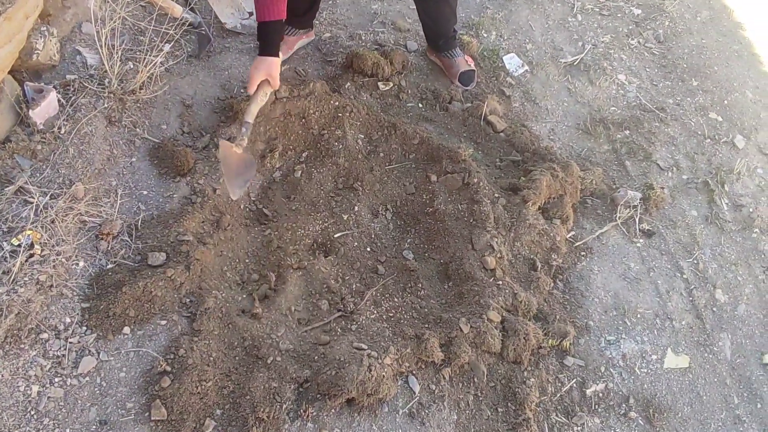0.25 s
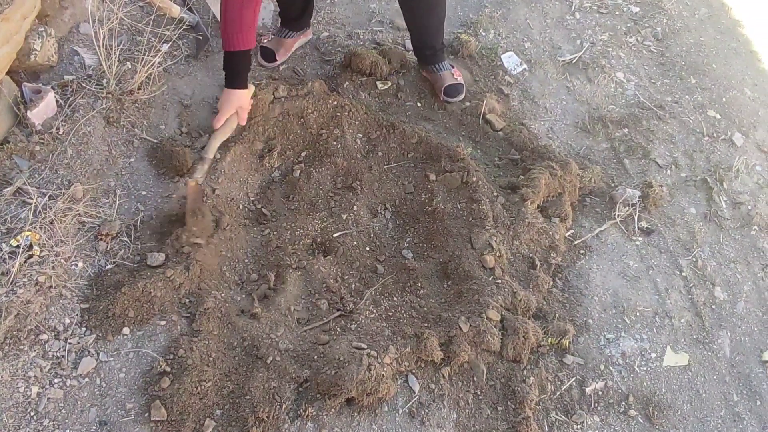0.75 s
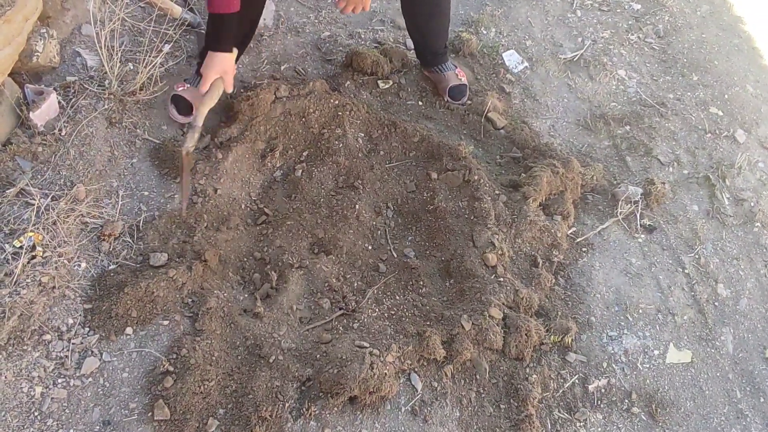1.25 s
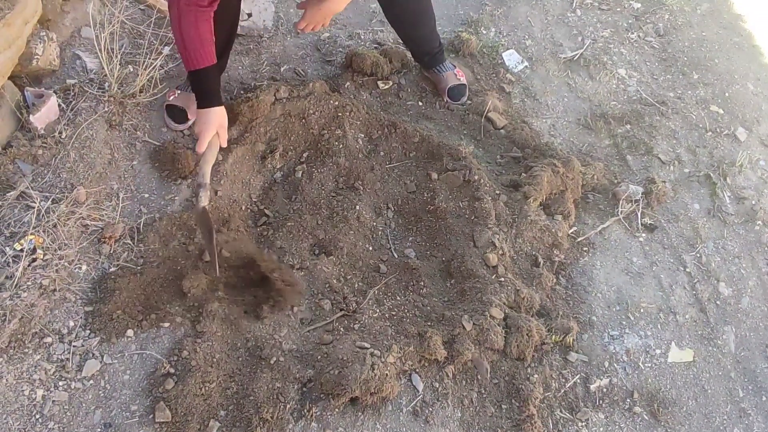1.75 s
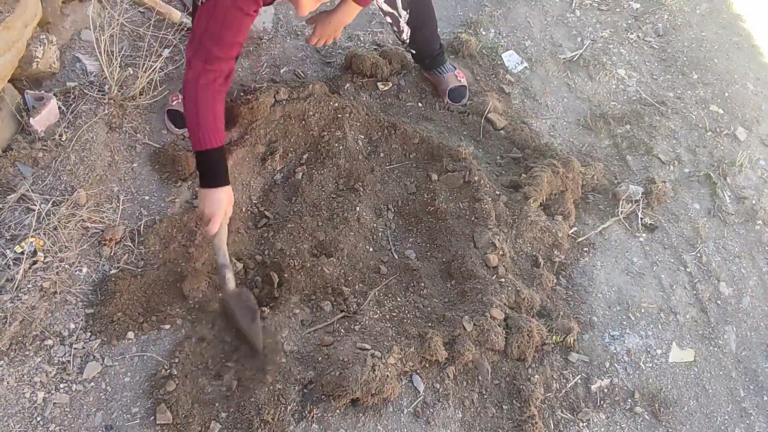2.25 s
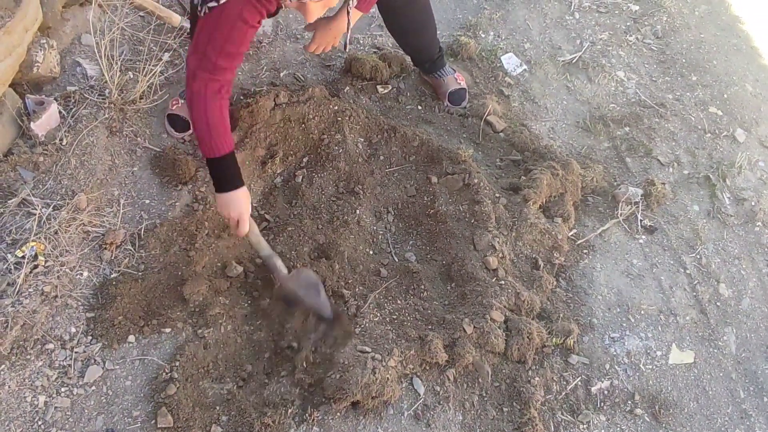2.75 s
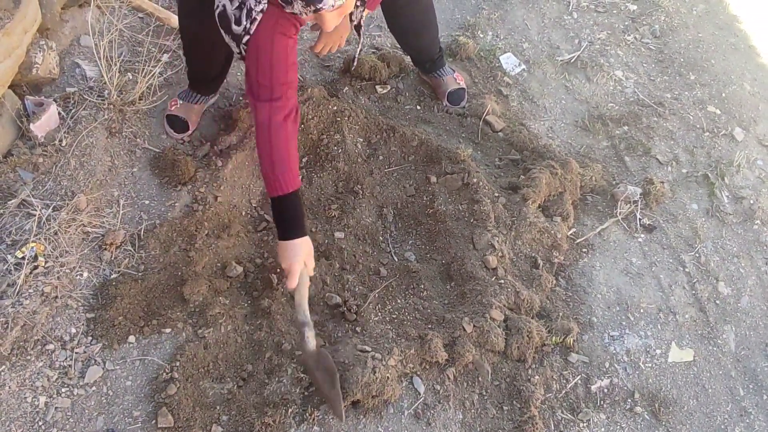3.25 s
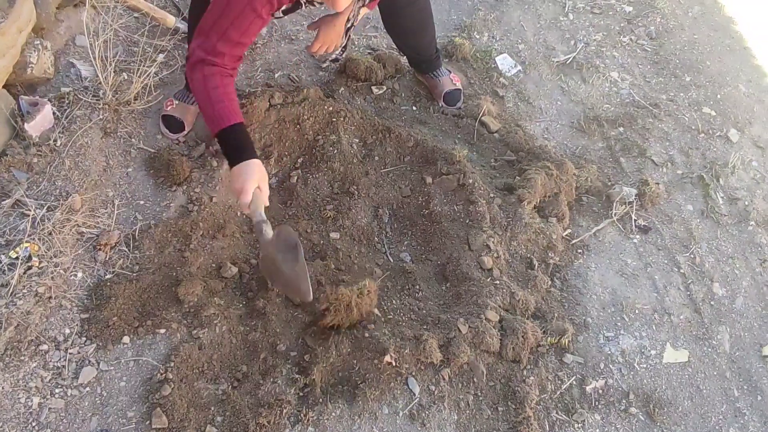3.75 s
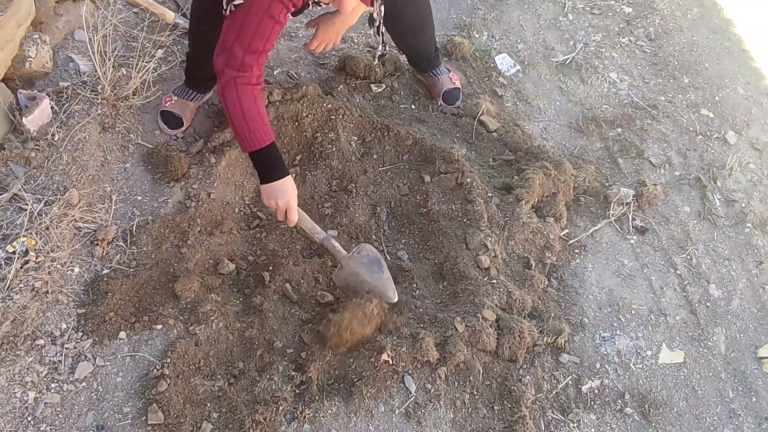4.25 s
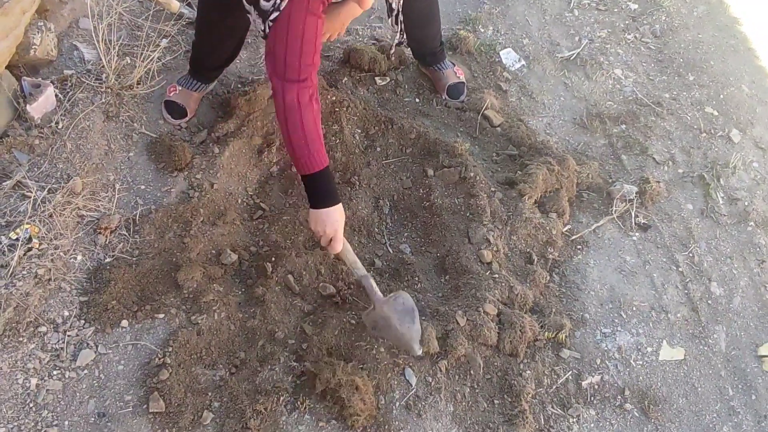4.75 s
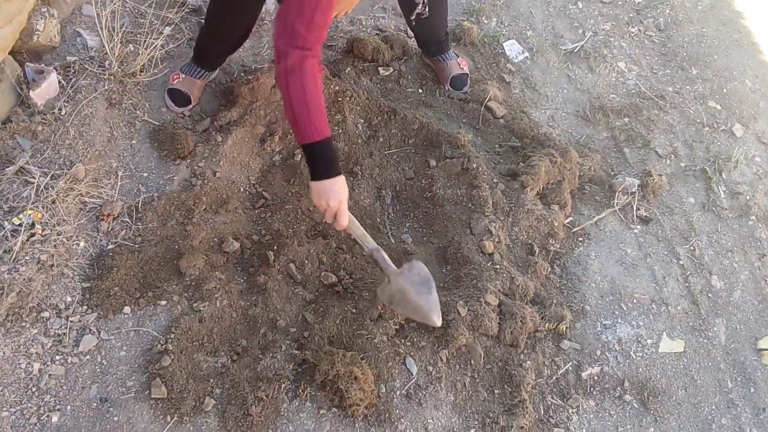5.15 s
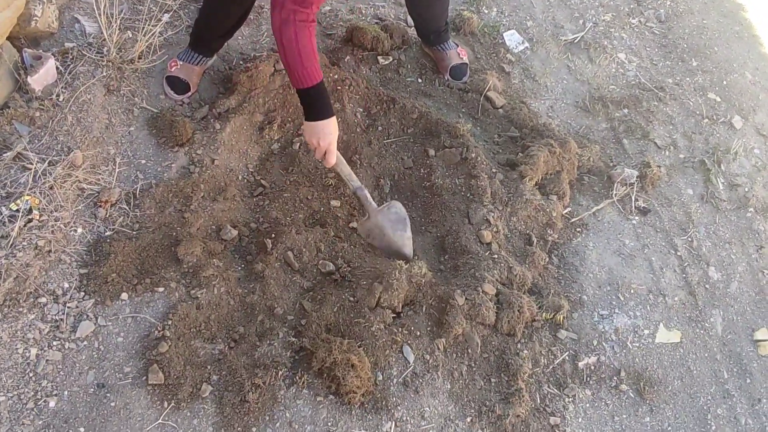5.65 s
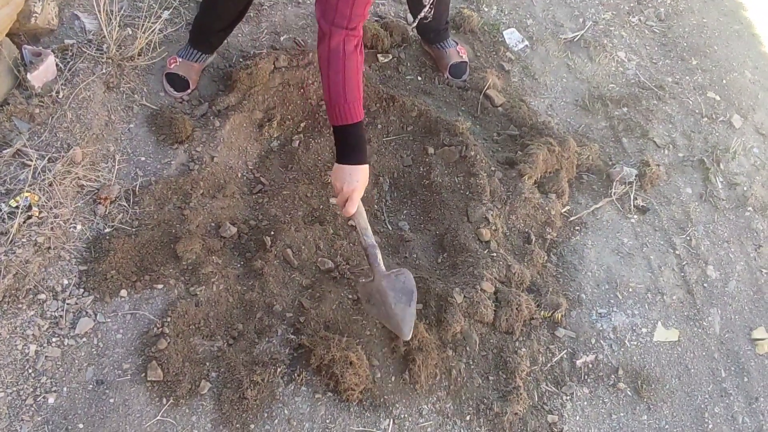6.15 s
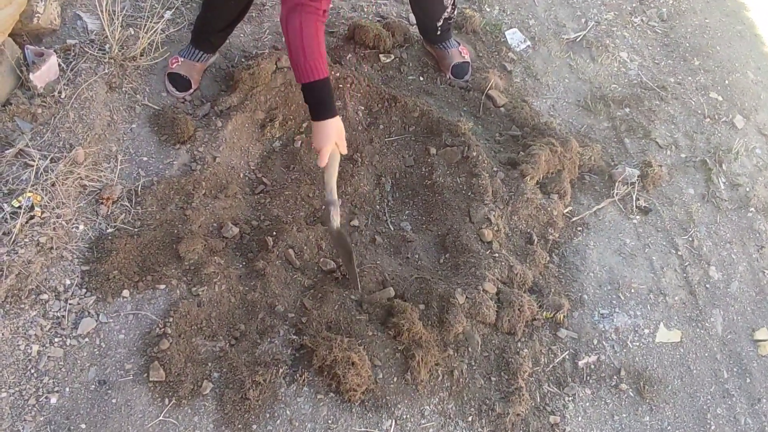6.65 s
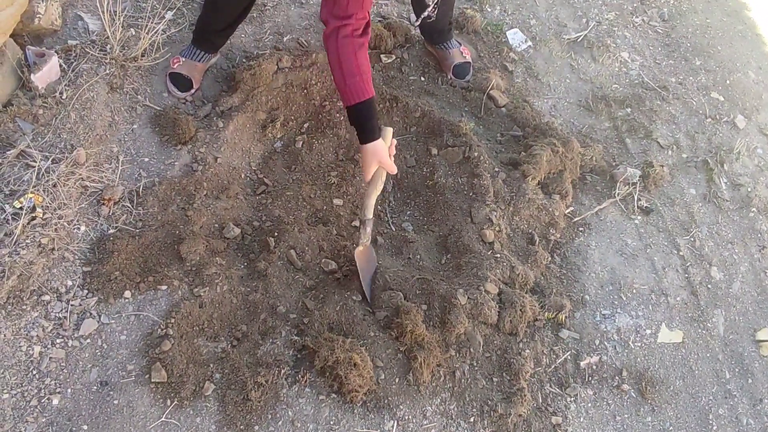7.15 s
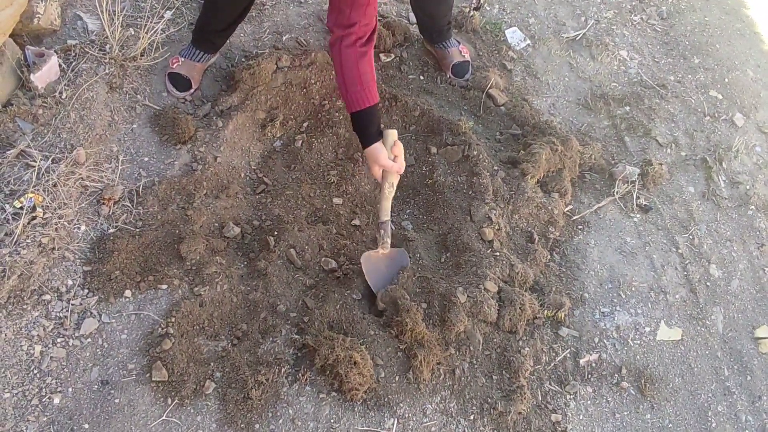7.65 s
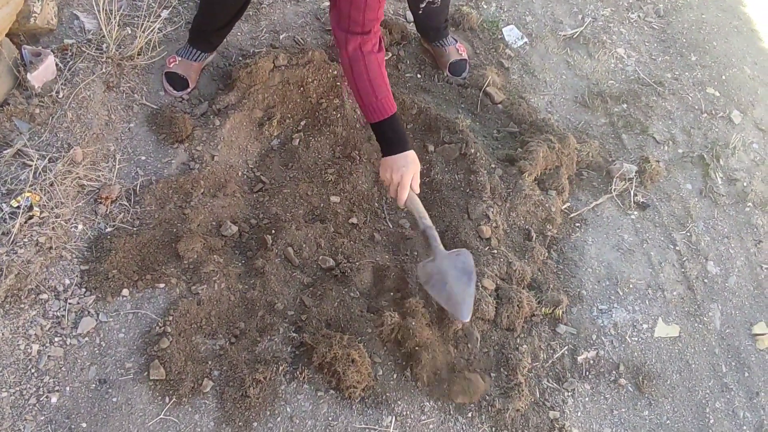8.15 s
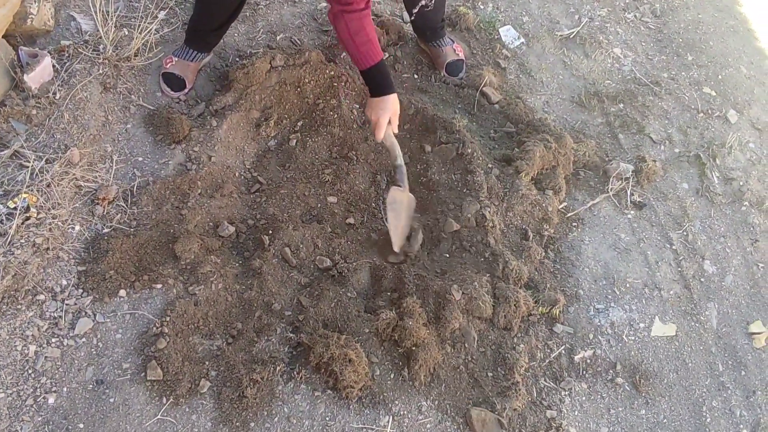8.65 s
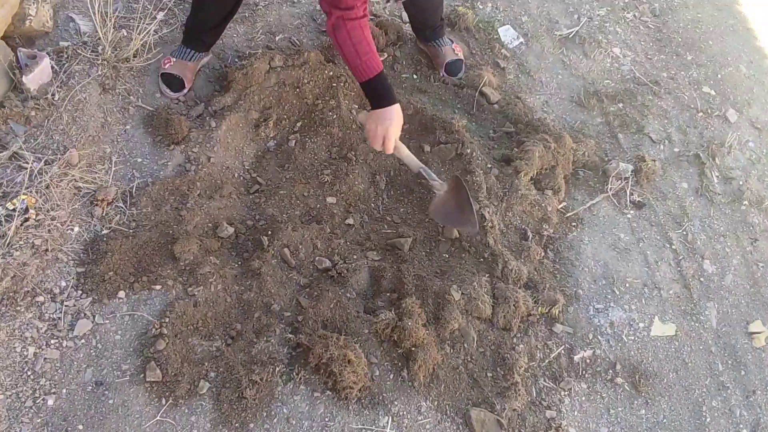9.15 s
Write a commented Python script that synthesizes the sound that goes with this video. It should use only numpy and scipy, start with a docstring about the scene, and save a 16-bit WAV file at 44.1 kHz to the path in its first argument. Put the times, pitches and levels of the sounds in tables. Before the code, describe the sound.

Gritty digging outdoors: steel blade strikes and drags through stony ground, loose dirt patters down, and low gusts rumble increasingly.

```python
"""Spade in stony soil

A spade chops and drags through dry stony soil: noise bursts ring the modes of the steel blade,
grit clicks along it, packed ground knocks, and thrown soil patters down as filtered ticks.
Gusts of shaped noise rumble at each microphone port on its own; a low sine sounds once, over faint hiss."""
import sys
import numpy as np
from scipy import signal
from scipy.fft import rfft, irfft
from scipy.io import wavfile
from scipy.ndimage import uniform_filter1d, map_coordinates

SR = 44100
rng = np.random.default_rng(int(sys.argv[2]) if len(sys.argv) > 2 else 0)


def store_pcm(level_fs):
    """Save levels as 16-bit WAV."""
    pcm = np.round(np.clip(level_fs, -1, 1) * 32767).astype(np.int16)
    wavfile.write(sys.argv[1], SR, np.atleast_2d(pcm).T)


N = 414540

# Modes of the steel blade. Each row: frequency in Hz, level in dB, t60 in s before damping.
BLADE_MODES = [(1580, -31, .04), (2140, -26, 0.05), (2370, -21, 0.13), (2617, -19, 0.0714),
               (3586, -14.5, 0.065), (4380, -18.5, 0.043), (4830, -26, 0.023), (5745, -17, 0.11),
               (6120, -12, 0.05), (6650, -24, 0.059), (7762, -5, .07), (10052, -8, .07), (7770, -4.5, 0.1),
               (8250, -8.5, 0.062), (9000, -6, 0.045), (9520, -20.5, 0.048), (10400, 0, .04),
               (11240, -22, 0.09), (13500, -15, 0.06), (13600, -22.5, .04)]
# Spectrum of stone on steel. Each row: frequency in Hz, relative level in dB per Hz.
GRIT_SPECTRUM = [(500, -62), (1000, -23), (1500, -23.5), (2400, -6.5), (3600, 8.5), (5200, -3), (7000, 6.5),
                 (9100, 10), (11000, 9), (13500, -1), (15000, 10.5)]
# How freely the blade rings; soft soil muffles it. Each row: time in s, ring gain in dB.
RING_FREEDOM = [(1.0, 2.5), (1.9, -0.5), (2.4, -0.5), (3.5, -1), (4.5, -3), (5.5, -3), (6.5, 2), (7.5, 1.5),
                (8.2, -4), (8.8, -2.5)]


def gain_of(db):
    """Decibels to an amplitude factor."""
    return 10 ** (np.asarray(db) / 20)


def evened(x):
    """Scaled to rms 1."""
    return x / np.sqrt(np.mean(x ** 2) + 1e-20)


def read(points, hz, axis=1):
    """A column of a spectrum table, interpolated over log frequency."""
    table = np.transpose(points)
    return np.interp(np.log(hz + 1), np.log(table[0] + 1), table[axis])


def coloured(x, points):
    """x filtered by a spectrum table, without phase shift."""
    hz = np.fft.rfftfreq(len(x), 1 / SR)
    return irfft(rfft(x) * gain_of(read(points, hz)), len(x))


def slow_noise(samples):
    """Noise smoothed twice over the given span, rms 1."""
    smooth = uniform_filter1d(rng.standard_normal(N), size=samples)
    return evened(uniform_filter1d(smooth, size=samples))


def follow(rows, rise_db_per_s, fall_db_per_s):
    """Gain of strokes: each rises, slides from its first level to its last, and falls away."""
    t, out = np.arange(N) / SR, np.zeros(N)
    for start_s, length_s, first_db, last_db in rows:
        near = slice(max(round((start_s - .2) * SR), 0), round((start_s + length_s + .3) * SR))
        u = t[near] - start_s
        db = np.interp(u, [0, length_s], [first_db, last_db])
        db += rise_db_per_s * np.minimum(u, 0)
        db -= fall_db_per_s * np.maximum(u - length_s, 0)
        out[near] = np.maximum(out[near], gain_of(db))
    return out


def add(mix, start_s, sound):
    """Mixes a two-port sound in at a time."""
    part = mix[:, max(round(start_s * SR), 0):][:, :sound.shape[1]]
    part += sound[:, :part.shape[1]]


def grains(per_s, spread_db, hiss):
    """Sparse clicks of uneven size over a fine hiss."""
    sizes = gain_of(spread_db * np.minimum(rng.exponential(1, N), 4))
    sizes *= rng.choice([-1., 1.], N)
    clicks = evened(sizes * (rng.random(N) < per_s / SR))
    return evened(clicks + hiss * rng.standard_normal(N))


def crunch_of(noise, decay_s):
    """Noise burst with a quick rise and an exponential decay."""
    t = np.arange(len(noise)) / SR
    rise = 1 - np.exp(-t / .0008)
    return noise * rise * np.exp(-t / np.clip(decay_s, .0005, .015))


def air():
    """Steady murmur and hiss: two noises, partly alike at the ports by frequency."""
    # Still air and microphone hiss. Each row: frequency in Hz, relative level in dB per Hz,
    # left-right likeness from 0 to 1.
    air_spectrum = [(19.7, -17.5, .3), (61.3, -2.5, 0.2), (131.2, -23.5, 0.57), (250, -19, 0.76),
                    (543, -25, 0.3), (960, -28, 0), (2230, -35, 0.14), (5960, -39, 0), (10140, -34.5, 0.02),
                    (13600, -39.5, 0)]
    level_db = -56.5
    hz = np.fft.rfftfreq(N, 1 / SR)
    a, b = rfft(rng.standard_normal((2, N)))
    same = np.clip(read(air_spectrum, hz, axis=2), -1, 1)
    ports = np.array([a, same * a + np.sqrt(1 - same ** 2) * b])
    return gain_of(level_db) * evened(irfft(ports * gain_of(read(air_spectrum, hz)), N))


def hum():
    """A brief steady low sine, alike at both ports."""
    start_s, length_s, hz, rms_db, fade_db_per_s = 5.47, 0.32, 100., -51.5, 191.5
    gain = follow([(start_s, length_s, rms_db, rms_db)], fade_db_per_s, fade_db_per_s)
    return np.sqrt(2) * gain * np.sin(2 * np.pi * hz * np.arange(N) / SR)


def eddy(hz):
    """One whirl of air at a port: a push, then suction."""
    u = hz * np.pi * np.arange(-600, 600) / SR
    return (1 - 2 * u ** 2 - 1.5 * u) * np.exp(-u ** 2)


def wind():
    """Lumpy turbulence, unrelated at the two ports, brighter as it strengthens, plus strong eddies."""
    # Gusts. Each row: peak time in s, peak level in dB, time to fall 10 dB in s (held to 0.03..1),
    # port (0 left, 1 right).
    gusts = [(.11, -34, 0.12, 0), (0.129, -37.5, 0.2, 1), (0.586, -20, 0.0273, 0), (0.701, -27.5, 0.24, 0),
             (0.817, -25.5, 0.13, 0), (1.25, -31, 0.16, 0), (1.3, -41, -1, 1), (1.801, -34.5, -0.02, 0),
             (1.989, -29, 0.25, 0), (2.07, -36.5, 0.47, 1), (2.15, -51, 1, 0), (2.38, -29.5, 0, 0),
             (2.45, -43.5, 1, 1), (2.65, -33, -0.38, 0), (2.76, -31.5, -0.6, 1), (2.819, -38, -0.4, 0),
             (3.02, -40, 0.44, 0), (3.311, -39, 0.56, 0), (3.53, -32.5, -0.1, 0), (3.63, -47, 2, 1),
             (3.73, -37, -0.26, 0), (4.11, -27, -0.05, 1), (4.17, -28, -0.15, 1), (4.16, -29.5, -0.18, 0),
             (4.351, -32, 0.16, 1), (4.42, -36, 0.48, 0), (5.2, -42.5, 0.05, 0), (5.78, -39, 0.36, 1),
             (6.021, -26.5, 0.11, 0), (6.072, -19, 0.0637, 1), (6.241, -20.5, 0.0337, 0),
             (6.248, -26.5, 0.32, 1), (6.449, -33, -0.4, 1), (6.482, -20, 0.16, 0),
             (6.671, -16.5, 0.1149, 1), (6.78, -26, 0, 0), (6.98, -25, 0.6, 0), (7.391, -21.5, 0.16, 0),
             (7.451, -34.5, 1, 1), (7.699, -29.5, 0.34, 1), (7.8, -27, 0.08, 0), (7.949, -28.5, -0.25, 1),
             (8.03, -22.5, -0.27, 0), (8.3, -21, 0.31, 1), (8.3, -27, 0.4, 0), (8.499, -22, -0.03, 0),
             (8.749, -35, -1, 0), (8.8, -15, 0.12, 1), (8.98, -22.5, -0.08, 0), (9.05, -24, 0.36, 1),
             (9.191, -26.5, 0.3, 0), (9.25, -33, 1.4, 1), (9.381, -32.5, 0.55, 0), (9.4, -33, -1.8, 1)]
    # Strongest eddies. Each row: centre time in s, level in dB, nominal frequency in Hz,
    # port (0 left, 1 right).
    eddies = [(0.081, -28.5, 213, 0), (0.565, -19, 250, 0), (0.638, -17, 268, 0), (.694, -27.5, 337, 0),
              (.736, -20.5, 457, 0), (.781, -18.5, 425, 0), (0.799, -19, 376, 0), (.824, -14, 440, 0),
              (.839, -11.5, 297, 0), (.865, -14, 442, 0), (1.961, -30.5, 233, 0), (3.026, -31, 215, 0),
              (4.099, -27.5, 197, 1), (6.066, -15.5, 191, 1), (6.256, -18.5, 198, 0),
              (6.449, -21.5, 390, 0), (6.646, -13, 210, 1), (6.754, -15, 249, 1), (7.221, -21, 251, 0),
              (7.394, -24.5, 373, 0), (7.409, -19.5, 310, 0), (7.453, -18, 297, 0), (7.467, -22.5, 366, 0),
              (7.976, -26.5, 330, 0), (8.025, -19.5, 420, 0), (8.47, -29, 250, 0), (8.502, -22, 232, 0),
              (8.71, -29, 258, 1), (8.743, -12.5, 225, 1), (8.823, -19, 202, 1), (8.925, -10, 175, 1),
              (8.982, -22, 280.5, 0), (9.186, -24, 236, 0)]
    # Weak wind. Each row: frequency in Hz, relative level in dB per Hz.
    weak_spectrum = [(8.8, -23), (15, 31.5), (81, 0.5), (216, -24.5), (269, -38.5), (400, -47),
                     (520, -73.5), (880, -120)]
    # Strong wind. Each row: frequency in Hz, relative level in dB per Hz.
    strong_spectrum = [(8.8, -36), (15, 2), (64, 7.5), (139, 2), (291, -14), (708, -48), (771, -52.5),
                       (900, -58), (1170, -86), (1980, -120)]
    calm_db, gale_above_calm_db = -51, 28
    rise_share = 0.91  # gusts rise faster than they fall

    frames, hz = N // 256 + 5, np.fft.rfftfreq(1024, 1 / SR)[:40]
    t = np.arange(frames) * 256 / SR
    out = np.zeros((2, N))
    peak_s, peak_db, fall_s, ports = np.transpose(gusts)[:, :, None]
    width_s = np.clip(fall_s * np.where(t < peak_s, rise_share, 1), .03, 1)
    swell_power = gain_of(peak_db - 10. * ((t - peak_s) / width_s) ** 2) ** 2
    for port in (0, 1):
        gust_power = swell_power[ports[:, 0].round() == port].sum(0)
        level_db = 10 * np.log10(gain_of(calm_db) ** 2 + gust_power)
        flicker = evened(uniform_filter1d(rng.standard_normal(frames), size=6))
        strength = (level_db - calm_db) / gale_above_calm_db * (1 + 0.12 * flicker)
        strength = np.clip(strength, 0, 1.25) ** 1.36
        shape_db = np.outer(read(weak_spectrum, hz), 1 - strength)
        shape_db += np.outer(read(strong_spectrum, hz), strength)
        shape = gain_of(shape_db)
        a, b = rng.standard_normal((frames, 40, 2)).T
        bins = (a + 1j * b) * shape / np.linalg.norm(shape, axis=0)
        bins = np.pad(bins, ((0, 473), (0, 0)))
        turbulence = signal.istft(bins, nperseg=1024, noverlap=768)[1][:N]
        lumps_db = 3.88 * np.clip(slow_noise(500), -3, 1.5)
        rush = evened(turbulence * gain_of(lumps_db))
        out[port] = rush * gain_of(np.interp(np.arange(N) / SR, t, level_db))
    for centre_s, db, eddy_hz, port in eddies:
        whirl = gain_of(db) * eddy(eddy_hz)
        add(out, centre_s - 600 / SR, np.outer([port < .5, port > .5], whirl))
    return out


def soil():
    """Thrown soil rains down as fine ticks spread over the ground; larger pebbles stand out."""
    # Soil pattering down. Each row: start in s, length in s, first level in dB, last level in dB.
    patter_rows = [(0, 0.23, -52, -56.5), (.28, 1, -62.5, -58), (1.07, 0.17, -53, -55.5),
                   (1.34, 0.059, -54.5, -51), (1.9, 0.071, -62.5, -50), (2.55, 0.18, -57, -66.5),
                   (3, 0.17, -52.5, -58.5), (3.75, 0.17, -59.5, -66.5), (4.6, 0.21, -65.5, -58),
                   (5.12, 0.1, -64.5, -62.5), (6, 0.24, -58, -60), (8.31, 0.052, -57, -52),
                   (8.45, 0.063, -60.5, -60.5)]
    # Pebbles and crumbs landing. Each row: time in s, peak level in dB.
    pebbles = [(0.054, -33), (0.104, -36), (0.2207, -43), (0.226, -33), (1.126, -29), (1.15, -40),
               (1.1877, -41), (1.248, -36.5), (1.377, -43), (1.911, -34), (1.9664, -28), (3.035, -25.5),
               (3.079, -35), (3.103, -37), (3.899, -45), (4.62, -45), (4.627, -39), (4.6423, -33.5),
               (4.669, -43), (4.695, -40), (4.752, -37), (4.7907, -37.5), (5.157, -40.5), (5.266, -43.5),
               (5.283, -45), (5.745, -46.5), (6.211, -39), (7.955, -41), (8.339, -39), (8.35, -34),
               (8.525, -37)]
    # Crumbs on the ground. Each row: frequency in Hz, relative level in dB per Hz.
    soil_spectrum = [(880, -40), (1500, -7), (1980, -4), (2620, -8), (5150, -7.5), (8000, 1), (10300, 3.5),
                     (11800, -5), (13800, -2.5), (15000, -14.5)]
    rise_db_per_s, fade_db_per_s = 258, 206

    near, wide = (evened(coloured(grains(per_s=1200, spread_db=3.5, hiss=1.1), soil_spectrum))
                  for _ in range(2))
    out = evened(np.array([near + .8 * wide, near - .8 * wide]))
    clumps_db = 2.23 * slow_noise(500)
    out *= follow(patter_rows, rise_db_per_s, fade_db_per_s) * gain_of(clumps_db)

    t = np.arange(1024) / SR
    envelope = (1 - np.exp(-t / 0.00013)) * np.exp(-t / 0.0022)
    for (start_s, db), noise in zip(pebbles, rng.standard_normal((len(pebbles), 1024))):
        tick = coloured(noise, soil_spectrum) * envelope
        add(out, start_s, gain_of(db) * np.array([tick, tick]) / abs(tick).max())
    return out


def thuds():
    """Packed ground answers the deepest chops with a dull knock: a short low noise burst."""
    # Thuds. Each row: start in s, peak level in dB.
    thud_rows = [(0.9358, -38.5), (1.7738, -27.5), (1.8096, -46.5), (5.956, -35.5), (6.897, -22),
                 (6.948, -37.5), (6.957, -34.5), (6.977, -35.5), (7.533, -43), (8.0762, -38), (8.545, -27),
                 (8.576, -30), (8.6715, -34)]
    # Packed ground. Each row: frequency in Hz, relative level in dB per Hz.
    knock_spectrum = [(250, 7), (600, -2), (1000, 18), (1500, 12), (2500, -28), (5000, -89.5)]
    decay_s = 0.0054
    out = np.zeros((2, N))
    for (start_s, db), noise in zip(thud_rows, rng.standard_normal((len(thud_rows), 4096))):
        knock = coloured(crunch_of(noise, decay_s), knock_spectrum)
        add(out, start_s, gain_of(db) * np.array([knock, knock]) / abs(knock).max())
    return out


def blade(chance, damping, spread_db):
    """Decaying modes at both ports; the contact point sets their levels, detuning and port phases."""
    hz, db, t60_s = np.transpose(BLADE_MODES)[:, :, None]
    level_chance, side_chance, pitch_chance, phase_chance = chance
    t, side = np.arange(4400) / SR, np.array([1, -1])[:, None, None]
    db = db + spread_db * level_chance + side * 2.5 * side_chance
    decay_db = 60 * t * damping / np.clip(t60_s, .01, .1)
    turns = hz * (1 + .007 * pitch_chance) * t
    port_phase = side * 1.43 * np.clip(hz / 7000, .75, 1) * phase_chance
    return (gain_of(db - decay_db) * np.sin(2 * np.pi * turns + port_phase)).sum(1)


def drag():
    """Grit clicks unevenly along the buried blade; the contact keeps moving to another part of it."""
    # Drags. Each row: start in s, length in s, first level in dB, last level in dB,
    # lift below 5 kHz in dB.
    drag_rows = [(0.843, 0.14, -53, -53, 12), (1.704, 0.049, -58.5, -45.5, -8.5),
                 (1.772, 0.058, -84, -41.5, 14), (2.276, 0.053, -47.5, -38, -2.5),
                 (2.389, 0.076, -36, -46.5, 3), (2.761, 0.04, -45.5, -35, -0.5),
                 (2.85, .16, -40.5, -46.5, 5.5), (3.5, 0.029, -46, -58.5, 12.5), (3.538, 0.13, -64, -56, 6),
                 (3.626, 0.11, -48.5, -60.5, 7.5), (4.328, 0.1, -35.5, -52.5, 6),
                 (4.476, 0.054, -63.5, -50.5, 8), (4.907, 0.011, -35, -31.5, -1),
                 (4.956, 0.12, -66.5, -50.5, 11.5), (5.466, 0.025, -21, -37.5, -6),
                 (5.513, 0.052, -49, -54, 6), (5.899, 0.018, -29, -54.5, 3), (5.954, 0.048, -34, -49, 3),
                 (6.388, 0.11, -54, -50, 9.5), (6.57, 0.017, -54, -53, 5.5),
                 (6.901, 0.014, -23.5, -40.5, 7), (6.95, 0.068, -29, -48, 10), (7.055, 0.033, -46, -46, 5),
                 (7.141, 0.025, -44.5, -57.5, 1), (7.22, 0.12, -39, -49.5, 2.5),
                 (7.299, 0.13, -48.5, -34.5, 1), (7.529, 0.14, -53, -69, 14), (7.633, 0.12, -62, -59.5, 11),
                 (7.74, 0.11, -50, -48.5, 12.5), (8.015, 0.063, -61, -51, 12),
                 (8.079, 0.1, -45.5, -62.5, 10.5), (8.194, 0.051, -53, -60, 2.5),
                 (8.549, 0.11, -31, -43.5, 12), (8.661, 0.17, -48, -35, 7)]
    bite_db_per_s, lift_db_per_s = 7000.5, 443
    contact_s = .05

    t, hop = np.arange(N) / SR, round(contact_s * SR)
    judder_db = 3.5 * slow_noise(110)
    grit = grains(per_s=4500, spread_db=4.5, hiss=.4)
    grit *= follow(np.array(drag_rows)[:, :4], bite_db_per_s, lift_db_per_s)
    grit *= gain_of(judder_db)

    out, window = np.zeros((2, N)), np.sin(np.pi * np.arange(2 * hop) / (2 * hop))
    chances = rng.standard_normal((N // hop - 1, 4, len(BLADE_MODES), 1))
    for k, chance in enumerate(chances):
        part = grit[k * hop:(k + 2) * hop] * window
        if abs(part).max() < 1e-5:
            continue
        ring = blade(chance, damping=3, spread_db=4)
        ring = ring / np.linalg.norm(ring[0])
        add(out, k * hop / SR, signal.fftconvolve(part[None], ring, axes=1))
    out *= gain_of(np.interp(t, *np.transpose(RING_FREEDOM)))

    click = coloured(np.eye(1, 512, 256)[0], GRIT_SPECTRUM)
    out += 1.26 * signal.oaconvolve(grit, click / np.linalg.norm(click), "same")
    below_5khz = signal.sosfilt(signal.butter(4, 5000, fs=SR, output="sos"), out)
    start_s, length_s, _, _, low_db = np.transpose(drag_rows)
    low_gain = gain_of(np.interp(t, start_s + length_s / 2, low_db))
    return out + (low_gain - 1) * below_5khz


def blows():
    """A short crunch of stone cracks and sets the blade ringing."""
    # Blade on stone. Each row: start in s, nominal peak level in dB, lift below 5 kHz in dB,
    # crunch decay in ms (held to 0.5..15).
    blow_rows = [(0.852, -30, -9, 5.4), (.913, -32, 2.5, 12), (0.929, -27, 0.5, 3.6),
                 (0.9348, -14.5, 5.5, 3.5), (.944, -20.5, 3.5, 4.9), (0.958, -25.5, 13, 2.3),
                 (1.7332, -29, -30, 16), (1.7755, -9.5, 10.5, 2.5), (1.812, -30.5, -2.5, 15),
                 (2.279, -26.5, 2, 4), (2.314, -19.5, 1, 3), (2.3258, -18, -0.5, 6.4),
                 (2.3503, -11, -4.5, 1.1), (2.364, -20.5, -1, 2), (2.369, -12.5, -1, 3.5),
                 (2.379, -28.5, -4, 3), (2.42, -20.5, 7.5, 7.4), (2.7683, -21, -5.5, 4.4),
                 (2.779, -17.5, -10.5, 4.5), (2.8208, -23, 0, 8.2), (2.8528, -8.5, -4, 2.8),
                 (2.901, -26, 9.5, 5.9), (2.9156, -9.5, -10, 3.2), (2.9358, -1.5, -4.5, 1.8),
                 (2.988, -26.5, 21.5, 5.97), (3.4994, -11, 2, 2.5), (4.331, -13.5, -3.5, 4.6),
                 (4.523, -37.5, 5, 6.6), (4.9095, -14.5, -8.5, 16), (4.925, -21.5, 6.5, 3.6),
                 (5.065, -37, -13, 6), (5.465, -5.5, -10, 3.3), (5.4858, -16.5, 5, 3), (5.887, -30, 5.5, 4),
                 (5.898, -21.5, -5.5, 4.3), (5.934, -15, 3.5, 4.3), (5.958, -14, 4.5, 2.4),
                 (6.384, -26.5, 10, 7.5), (6.438, -28.5, 4, 6), (6.4585, -18, -9.5, 7.6),
                 (6.897, -12.5, -2, 5), (6.951, -30.5, -9, 5), (6.9637, -13.5, -10, 4.5),
                 (7.0484, -25.5, -8, 3), (7.072, -26, -11, 3.9), (7.0905, -37, -3, 1.7),
                 (7.142, -33, -17, 5.1), (7.2271, -10, -11, 2.5), (7.5337, -30.5, -0.5, 21),
                 (8.0782, -30, 16, 4.9), (8.3213, -28, 15, 1.1), (8.545, 3, 2.5, 6.5), (8.574, -22, 9.5, 4),
                 (8.6714, -15.5, 1.5, 7.3), (8.726, -21, 6, 17), (8.745, -10, -6.5, 3.2),
                 (8.794, -10.5, 4.5, 5), (8.826, -17.5, 3, 7.3)]
    ring_share, crack_share = 0.82, 0.97
    out = np.zeros((2, N))
    chances = rng.standard_normal((len(blow_rows), 4, len(BLADE_MODES), 1))
    noises = rng.standard_normal((len(blow_rows), 2048))
    for (start_s, db, low_db, decay_ms), chance, noise in zip(blow_rows, chances, noises):
        crunch = crunch_of(noise, decay_ms / 1000)
        modes = blade(chance, damping=1.87, spread_db=1.5)
        ring = signal.fftconvolve(modes, crunch[None], axes=1)
        crunch = np.pad(crunch, (0, ring.shape[1] - len(noise)))
        free = gain_of(np.interp(start_s, *np.transpose(RING_FREEDOM)))
        crack = evened(coloured(crunch, GRIT_SPECTRUM))
        sound = ring_share * free * evened(ring) + crack_share * crack
        sound = np.array([coloured(port, [(4500, low_db), (5500, 0.0013)]) for port in sound])
        # peak estimated from the loudest 130-sample rms
        peak = 2.6 * np.sqrt(uniform_filter1d((sound ** 2).mean(0), size=130).max())
        add(out, start_s, gain_of(db) * sound / peak)
    return out


def port_difference(x):
    """Stereo filter: level and phase between left and right vary with frequency."""
    # Phase between ports. Each row: frequency in Hz, left port ahead in radians.
    port_phase = [(0, -3), (1030, 1.74), (1290, 2.1), (1980, 1.32), (2500, 1.5), (3100, 4), (4050, 3.0),
                  (4910, 10.5), (5940, 14), (6550, 13), (9040, 27), (10200, 30), (11100, 29), (12700, 30.5),
                  (15000, 29)]
    # Level between ports. Each row: frequency in Hz, left-right difference in dB.
    port_balance = [(1000, 2), (2400, -5.5), (4400, -1), (8000, -3.5), (14000, 4)]
    hz = np.fft.rfftfreq(N, 1 / SR)
    # half the difference goes to each port
    turn = gain_of(read(port_balance, hz) / 2) * np.exp(.5j * read(port_phase, hz))
    return irfft(rfft(x) * np.array([turn, 1 / turn]), N)


def scene():
    """Spade and soil from their place through the stereo filter, then wind, hum and air."""
    # Where the spade works. Each row: time in s, left-right difference in dB, left port later in ms.
    place = [(0, 0, 0.1), (.9, 2, 0.059), (1.8, 3.5, 0.072), (2.35, 0.5, 0.03), (2.9, -1, 0.054),
             (3.501, 0.5, 0.025), (4.9, 0.5, 0.041), (6.899, 0.5, 0.032), (7.801, 1.5, 0.032),
             (9.4, -1.5, -0.018)]
    place_s, *columns = np.transpose(place)
    balance_db, later_ms = (np.interp(np.arange(N) / SR, place_s, c) for c in columns)
    spade = blows() + thuds() + drag() + soil()
    left, right = spade * gain_of(np.outer([.5, -.5], balance_db))
    left = map_coordinates(left, [np.arange(N) - later_ms * SR / 1000], order=5)
    return port_difference(np.array([left, right])) + wind() + hum() + air()


def record(dry):
    """Treble roll-off above 14 kHz, soft overload of the loudest peaks, then the band limit."""
    rolloff = signal.firwin(191, 14300, window=("kaiser", 5), fs=SR)
    band_limit = signal.firwin(511, 15300, window=("kaiser", 9), fs=SR)
    overload = 1.05  # amplitude the output cannot pass before the band limit
    soft = signal.oaconvolve(dry, rolloff[None], "same")
    soft = soft / (1 + (soft / overload) ** 4) ** .25
    return signal.oaconvolve(soft, band_limit[None], "same")


dry = scene()
out = record(dry)
store_pcm(out)
```